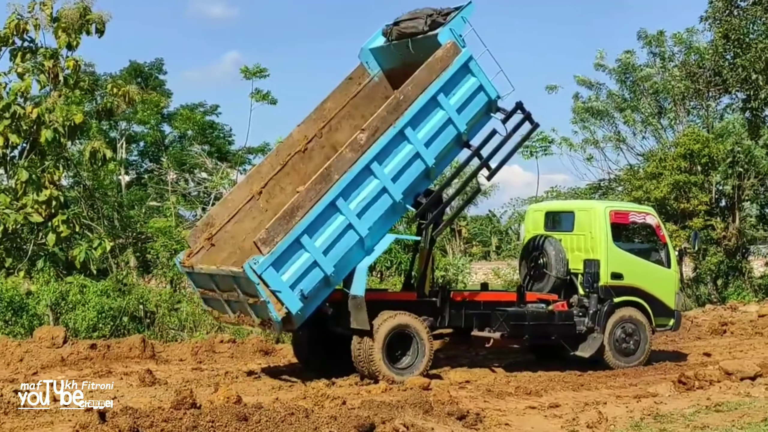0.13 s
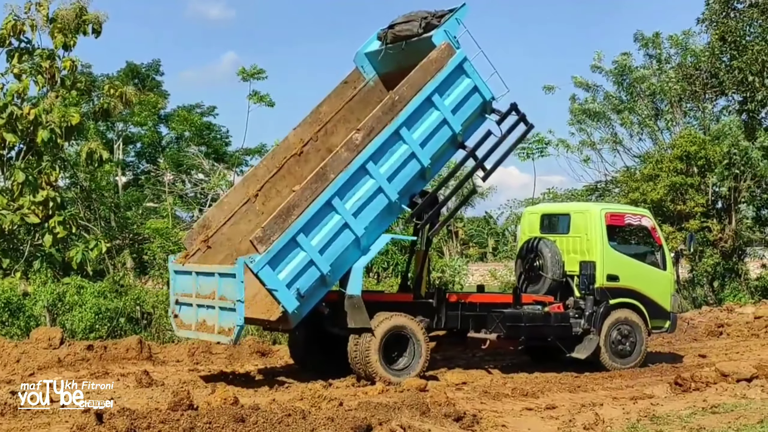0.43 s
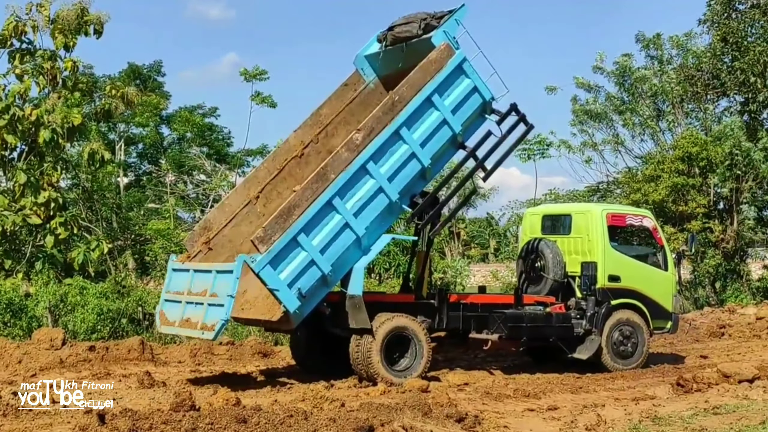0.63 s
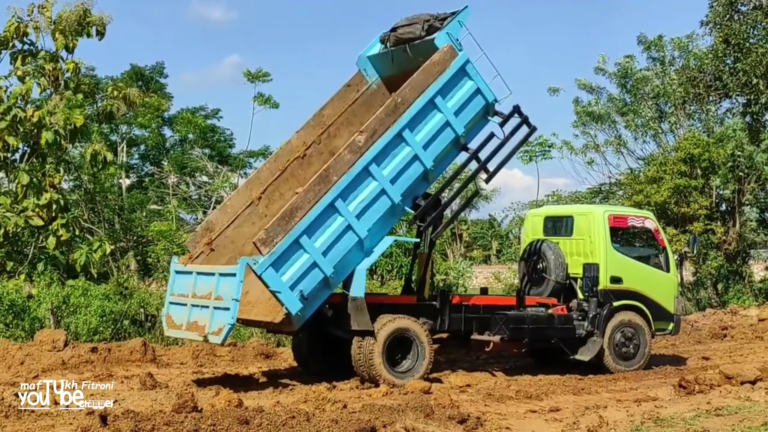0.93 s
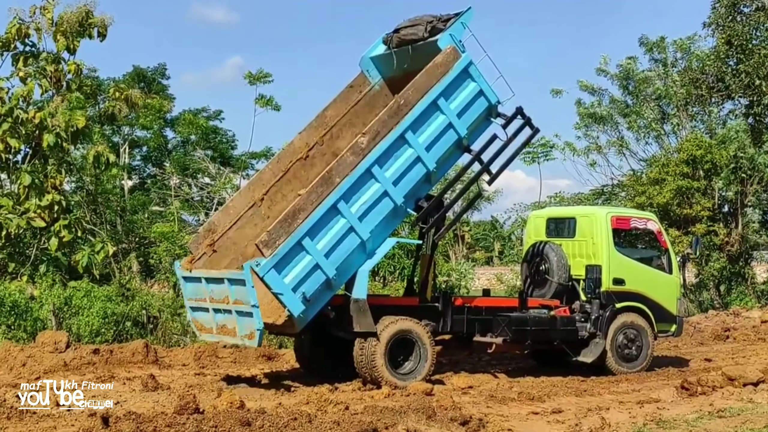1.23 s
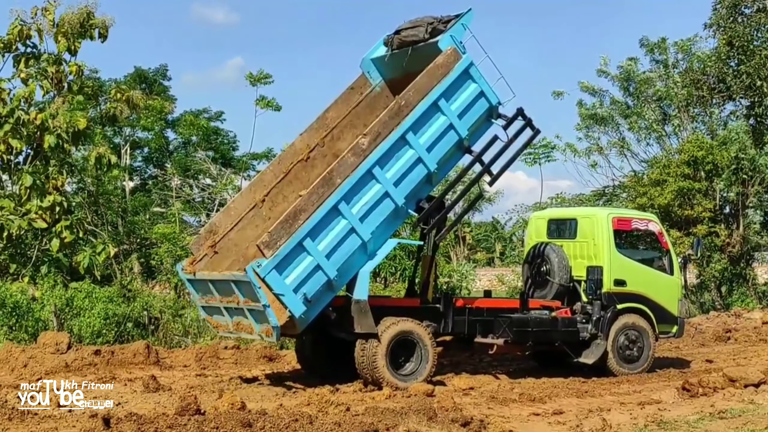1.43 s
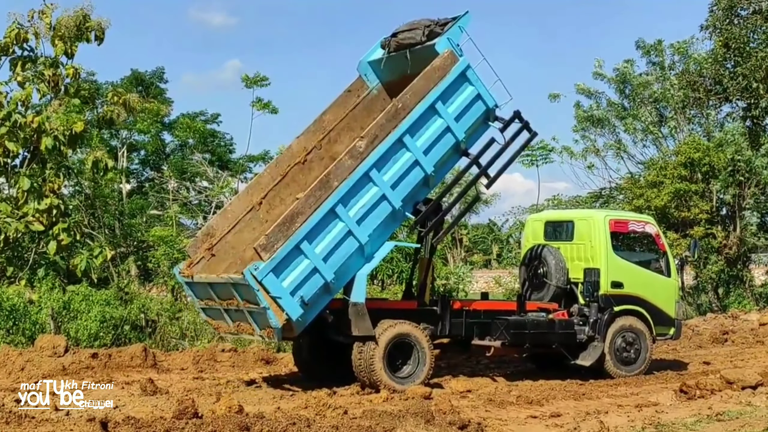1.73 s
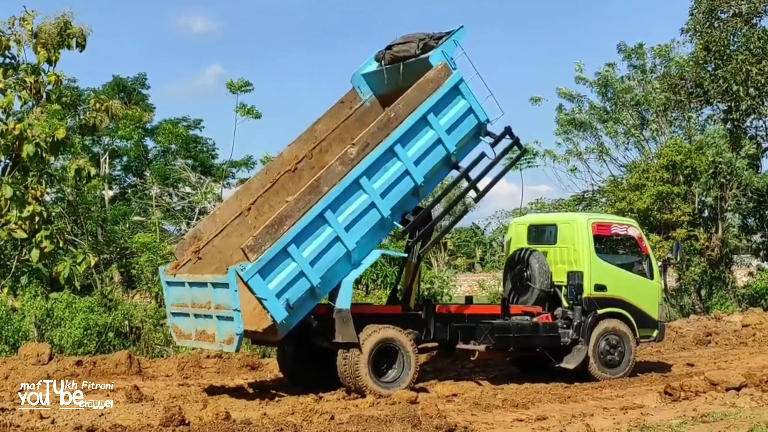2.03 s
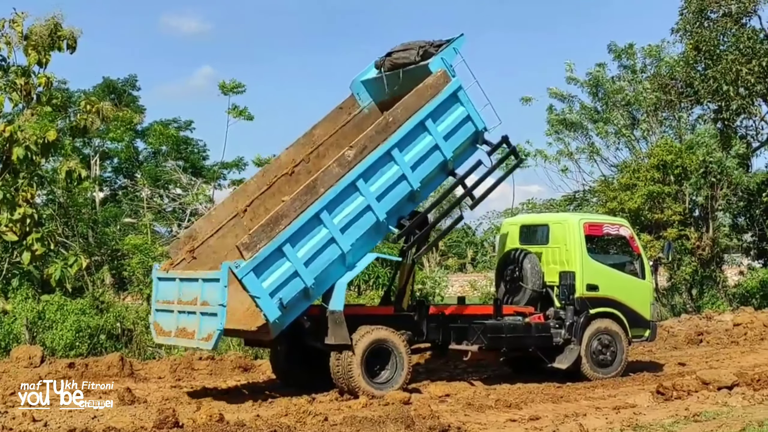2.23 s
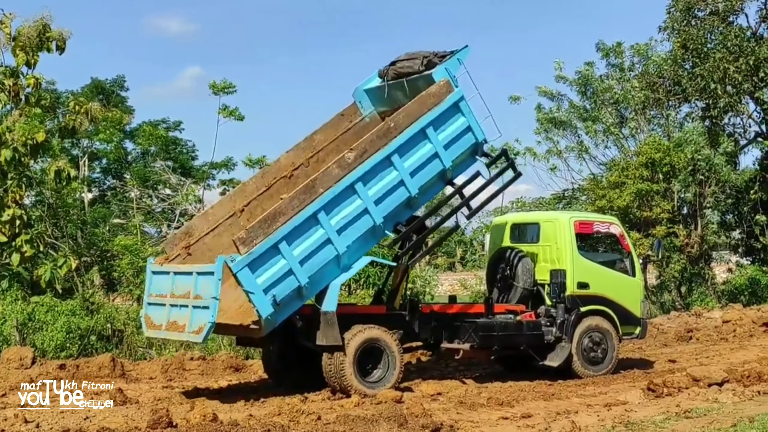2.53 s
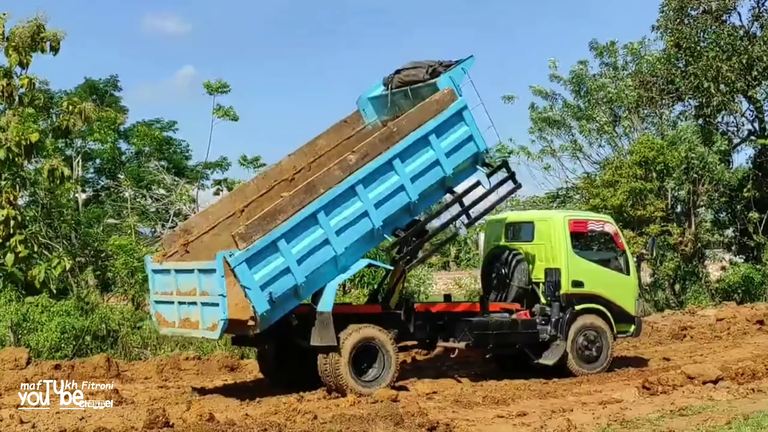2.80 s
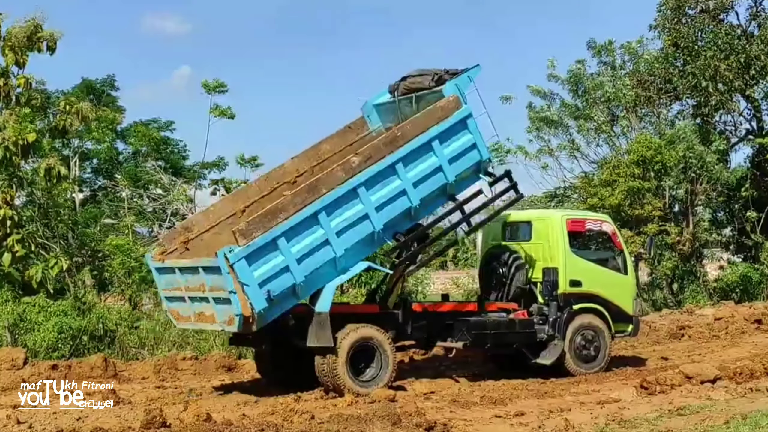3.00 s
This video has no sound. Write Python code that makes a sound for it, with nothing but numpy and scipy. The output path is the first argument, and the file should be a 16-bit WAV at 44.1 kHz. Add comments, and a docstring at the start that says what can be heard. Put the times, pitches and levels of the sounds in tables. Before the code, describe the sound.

A diesel dump truck clatters at idle on open ground over a low boom and whirring machinery. Its steel tailgate bangs shut early with small clinks, the lowering body creaks softly twice, and a hiss swells near the end.

```python
"""A four-cylinder diesel dump truck clatters at idle on open ground while its raised body comes down.
Each firing knocks the block, ticks the injectors, rattles the chassis and puffs the exhaust,
over a low boom and whirring machinery. Early on the swinging steel tailgate bangs shut once:
a few quick blows ring its panels, and its fittings clink. The body creaks softly twice,
and a hiss swells near the end."""
import sys
import numpy as np
from scipy import signal
from scipy.fft import rfft, irfft
from scipy.io import wavfile
from scipy.ndimage import uniform_filter1d, minimum_filter1d

SR = 44100
rng = np.random.default_rng(int(sys.argv[2]) if len(sys.argv) > 2 else 0)


def store_wav(level_fs):
    """Save 16-bit WAV to argv[1]."""
    pcm = np.round(np.clip(np.atleast_2d(level_fs), -1, 1) * 32767)
    wavfile.write(sys.argv[1], SR, pcm.T.astype(np.int16))


N = 139356
T, HZ = np.arange(N) / SR, np.arange(N // 2 + 1) * SR / N

# Noise spectra. Each row: frequency in Hz, relative density in dB.
WHIRR_SPECTRUM = [(5, -37), (20, 7.5), (40, -13.5), (68, 2), (95, -12), (150, 0), (200, -2), (250, -5),
                  (335, -11), (430, -14.5), (540, -8.5), (680, -15.5), (1000, -13.5), (1350, -10),
                  (1600, -15), (2300, -15), (3000, -20), (3900, -25.5), (5600, -27), (7000, -22),
                  (8200, -23.5), (10500, -44), (13000, -60)]
HISS_SPECTRUM = [(2500, -53), (4500, 15), (8000, 8), (10500, -0.5), (13000, -7.5)]
INJECTOR_SPECTRUM = [(2200, -3), (2900, -20.5), (3800, -8), (4900, 0.5), (5900, -2.5), (6900, 8), (8100, 2),
                     (9300, -11.5), (10600, -23), (13000, -23)]
RATTLE_SPECTRUM = [(40, -52), (150, -25), (300, -1), (345, -7.5), (425, 9.5), (480, -5), (560, 1.5),
                   (680, -20.5), (1000, 2.5), (1800, -6.5), (3000, -19.5), (5000, -34), (9000, -56)]
# Layer envelopes. Each row: time in seconds, level in dB.
WHIRR_LEVEL_DB = [(0, -34), (.6, -34), (1.4, -34), (2.2, -33.5), (2.6, -34), (2.85, -32.5), (3.16, -32.5)]
HISS_LEVEL_DB = [(0, -51.5), (1.6, -56.5), (2.4, -56), (2.85, -47.5), (3.05, -43), (3.16, -49.5)]
BOOM_LEVEL_DB = [(0, -28.5), (.2, -25.5), (.42, -24), (1.0, -24), (1.15, -31), (1.37, -28.5), (1.7, -29),
                 (1.88, -33), (2.05, -33), (2.25, -32.5), (2.48, -39), (2.76, -29), (2.9, -29.5),
                 (3.16, -31.5)]
RUMBLE_LEVEL_DB = [(0, -42), (.9, -41), (1.4, -37.5), (2.0, -37.5), (3.16, -35.5)]
GROWL_LEVEL_DB = [(0, -44.5), (1.0, -44.5), (2.0, -42), (2.5, -40), (3.16, -41.5)]
# Machinery drones. Each row: centre in Hz, nominal width in Hz, level in dB.
DRONE_BANDS = [(133.5, 10.7, -44), (296.5, 6.5, -43), (375, 5.2, -52), (2358, 15.5, -60)]
# Boom pitch. Each row: time in seconds, frequency in Hz.
BOOM_PITCH_HZ = [(0, 49), (.2, 51.5), (.42, 52.5), (.8, 54.5), (1.04, 55.5), (1.33, 53.5), (1.75, 54),
                 (2.0, 51.5), (2.3, 51.5), (2.5, 56), (2.8, 51), (3.16, 47)]
# Body creaks. Each row: peak time in seconds, half-length in seconds, centre in Hz, level in dB.
BODY_CREAKS = [(0.583, 0.028, 800, -39), (2.798, 0.028, 865, -39)]
# Fitting clinks. Each row: start in seconds, pitch in Hz, ring t60 in seconds, level in dB,
# left minus right in dB.
FITTING_CLINKS = [(.243, 8600, .03, -33, 8), (.251, 8245, .055, -25, 10), (.377, 8200, .025, -29, 5)]
# Tailgate blows. Each row: start in seconds, then bright, middle and deep band gains in dB.
GATE_BLOWS = [(0.2222, 2.5, -.5, -10), (0.247, -2, -1, 0), (.269, -8, -8, -3), (.291, -9.5, -10, -11.5),
              (0.304, -24, -5.5, -5.5)]
# Tailgate modes and dense sheet-metal ringing. Each row: frequency in Hz, t60 in seconds, gain in dB.
GATE_MODES = [(79.6, 1, -7.5), (117.8, 0.45, 4.5), (141.3, 0.98, 2.5), (206.5, 0.39, 1), (252.8, 0.31, 2),
              (284, 0.64, -5), (367.5, 0.54, -0.5), (466, 0.19, -1.5), (538, 0.27, 1.5), (586, .36, -2.5),
              (761, 1, -15), (817, 0.17, 3.5), (880, 0.21, -6), (920, 0.19, -1), (985, 0.2, -6),
              (1150, 0.18, -28), (1257, 0.084, -0.5), (1410, 0.11, -19), (1520, 0.17, -17)]
SHEET_BANDS = [(141, 0.48, -28), (259, 0.71, -26), (527, 0.35, -22.5), (867, 0.23, -23.5),
               (1396, 0.22, -26.5), (2800, 0.17, -36.5), (4100, 0.34, -37)]
# Engine speed. Each row: time in seconds, firing rate in Hz.
FIRING_RATE_HZ = [(0.0, 26.27), (0.2, 24.26), (0.5, 23.39), (0.9, 22.92), (1.4, 22.45), (1.9, 21.71),
                  (2.4, 20.98), (2.8, 21.38), (3.16, 21.76)]
# Cylinders in firing order. Each row: relative dB of low knock, of high knock, of tick/rattle/growl.
CYLINDER_GAINS_DB = [(-3.5, .5, 15), (3, 1, 16), (2, -6.5, 16.5), (3.5, -0.5, 16.5)]
# Block and chassis resonances. Each row: frequency in Hz, width in Hz, relative gain in dB.
BLOCK_LOW_MODES = [(1240, 36, -3), (1292, 55, 0), (1356, 26, 2.5), (1448, 40, -4)]
BLOCK_HIGH_MODES = [(1728, 22, 6), (1805, 60, 1), (1944, 14, -3.5), (2081, 15, -4.5), (2177, 18, -6),
                    (2358, 11, -2), (2517, 30, -9), (2605, 35, -7.5), (2670, 40, -7.5), (2980, 220, -16)]
CHASSIS_MODES = [(295.3, 49, -9), (431, 30, 6.5), (536, 30, -2.5)]
# Exhaust harmonics. Each row: multiple of the firing rate, level in dB.
EXHAUST_HARMONICS = [(1, -45), (2, -57), (3, -46.5), (4, -49), (5, -48.5), (6, -49), (7, -44), (8, -50.5),
                     (9, -63)]
# Stereo balance. Each row: frequency in Hz, left minus right in dB.
BALANCE_DB = [(60, 4.5), (200, 5), (500, 3), (900, 5), (1350, 4.5), (1900, 7.5), (2300, 3), (2800, 2),
              (3700, -4), (4800, -1), (5800, -3), (6800, -14), (7500, -4), (8300, 5), (9300, 10),
              (10500, 1.5), (13000, 2.5)]
# Stereo likeness. Each row: frequency in Hz, left-right correlation from -1 to 1.
CORRELATION = [(100, 0.94), (300, 1), (700, 0.89), (1400, 0.57), (2200, 0.71), (3000, 0), (4000, -0.45),
               (6000, -0.15), (12000, 0.03)]

GATE_DB, GATE_ATTACK_S, DEEP_BELOW_HZ, BRIGHT_ABOVE_HZ = -25.5, .002, 330, 690
HEAVE_AT_S, HEAVE_HALF_S, HEAVE_HZ, HEAVE_DB = .327, .022, 49, -17
FIRST_FIRING_S, FIRING_JITTER_S = .0062, .0003
LOW_KNOCK_DB, HIGH_KNOCK_DB, TICK_DB = -38, -38.5, -45.5
RATTLE_DB, RATTLE_RISE_DB_PER_S = -48, 5.5
CEILING, LIMITER_S, LOWPASS_HZ = .44, .0018, 13200


def undb(db):
    """Decibels to gain."""
    return 10 ** (np.asarray(db) / 20)


def by_time(rows):
    """Interpolate (s, value) rows linearly."""
    return np.interp(T, *np.array(rows).T)


def by_hz(rows):
    """Interpolate (Hz, value) rows over log frequency."""
    hz, value = np.array(rows).T
    return np.interp(np.log(HZ + 1), np.log(hz + 1), value)


def level(x, db):
    """Set the rms level."""
    return x * undb(db) / np.sqrt(np.mean(x ** 2))


def through(x, response):
    """Filter by a frequency response."""
    return irfft(rfft(x) * response, N)


def noise(response, db=0):
    """Two independent filtered noises at a set rms level."""
    return level(through(rng.standard_normal((2, N)), response), db)


def resonance(hz, width_hz):
    """Response of one resonance, unity at its centre."""
    return 1j * HZ * width_hz / (hz ** 2 - HZ ** 2 + 1j * HZ * width_hz)


def highpass(hz):
    """Steep high-pass response."""
    return HZ ** 12 / (HZ ** 12 + hz ** 12)


def metal(modes):
    """Response of summed resonances; heavy metal dulls the treble."""
    dull = 1 / (1 + 1j * HZ / 5000)
    return dull * sum(undb(db) * resonance(hz, width_hz) for hz, width_hz, db in modes)


def minimum_phase(spectrum):
    """Causal response with the given (Hz, dB) shape."""
    cepstrum = irfft(np.log(undb(by_hz(spectrum))), N)
    cepstrum[1:N // 2] *= 2
    cepstrum[N // 2 + 1:] = 0
    return np.exp(rfft(cepstrum))


def strike(start_s, attack_s, t60_s):
    """Envelope: linear rise, exponential fall."""
    age_s = np.maximum(T - start_s, 0)
    return np.minimum(age_s / attack_s, 1) * np.exp(-np.log(1000) * age_s / t60_s)


def spread(pair):
    """Mix two independent signals to stereo: alike in the bass, unlike in the treble."""
    correlation = by_hz(CORRELATION)
    mid = through(pair[0], np.sqrt((1 + correlation) / 2))
    side = through(pair[1], np.sqrt((1 - correlation) / 2))
    return np.array([mid + side, mid - side])


def machinery():
    """Fan and gear whirr, narrow drones, and a late-swelling hiss, probably oil leaving the ram."""
    whirr = noise(undb(by_hz(WHIRR_SPECTRUM))) * undb(by_time(WHIRR_LEVEL_DB))
    hiss = noise(undb(by_hz(HISS_SPECTRUM))) * undb(by_time(HISS_LEVEL_DB))
    drones = sum(noise(resonance(hz, 1.28 * width_hz) ** 2, db) for hz, width_hz, db in DRONE_BANDS)
    return spread(whirr + hiss + drones)


def boom():
    """A low tone wanders in pitch over a growing, uneven rumble."""
    phase = 2 * np.pi * np.cumsum(by_time(BOOM_PITCH_HZ)) / SR
    tone = np.sqrt(2) * undb(by_time(BOOM_LEVEL_DB)) * np.sin(phase)
    rumble = noise(resonance(60.2, 30.3) ** 2) * undb(by_time(RUMBLE_LEVEL_DB))
    return tone + spread(rumble)


def creaks():
    """Short, soft scrapes from the moving body."""
    return spread(sum(noise(resonance(hz, 300) ** 2, db) * np.exp(-((T - peak_s) / half_s) ** 2)
                      for peak_s, half_s, hz, db in BODY_CREAKS))


def clinks():
    """Small steel fittings tick and ring briefly."""
    out = np.zeros((2, N))
    for start_s, hz, t60_s, db, pan_db in FITTING_CLINKS:
        tick = noise(resonance(hz, 2000) ** 4, db=-9.5) * strike(start_s, attack_s=.00087, t60_s=.15)
        ring = strike(start_s, attack_s=.0038, t60_s=t60_s) * np.sin(2 * np.pi * hz * T)
        out += (tick + ring) * undb(db + np.array([[pan_db], [-pan_db]]) / 2)
    return out


def gate_envelope(hz, t60_s):
    """Each blow adds its energy to what still rings at this frequency."""
    band = 3 if hz < DEEP_BELOW_HZ else 2 if hz < BRIGHT_ABOVE_HZ else 1
    energy = sum((undb(blow[band]) * strike(blow[0], GATE_ATTACK_S, t60_s)) ** 2 for blow in GATE_BLOWS)
    return np.sqrt(energy)


def tailgate():
    """The gate lands in quick blows: bright clatter, then deep panels, then one heave of the body."""
    ring = np.zeros(N)
    for hz, t60_s, db in GATE_MODES:
        mode = rng.choice([-1, 1]) * np.sin(2 * np.pi * hz * (T - GATE_BLOWS[0][0]))
        ring += undb(GATE_DB + db) * gate_envelope(hz, t60_s) * mode
    clatter = sum(gate_envelope(hz, t60_s) * noise(resonance(hz, .8 * hz) ** 4, db)
                  for hz, t60_s, db in SHEET_BANDS)
    lag_s = T - HEAVE_AT_S
    heave = undb(HEAVE_DB) * np.exp(-(lag_s / HEAVE_HALF_S) ** 2) * np.sin(2 * np.pi * HEAVE_HZ * lag_s)
    return ring + heave + spread(clatter)


def impacts(starts_s, response, gain_column, attack_s, decay_s, scatter_db, slap_db, slap_s, repeat):
    """Each firing rings a part with one slap and a cluster of tiny impacts."""
    size = SR // 4
    age_s = np.arange(size) / SR
    envelope = np.minimum(age_s / attack_s, 1) * np.exp(-age_s / decay_s)
    ring = rfft(irfft(response, N)[:size])
    out = np.zeros((2, N + size))
    patterns = rng.standard_normal((4, 2, size))  # one per cylinder; repeat is its share of the energy
    for k, start_s in enumerate(starts_s):
        cluster = np.sqrt(repeat) * patterns[k % 4] + np.sqrt(1 - repeat) * rng.standard_normal((2, size))
        force = envelope * cluster / np.linalg.norm(envelope)
        force[0, int(slap_s * SR)] += undb(slap_db)
        db = CYLINDER_GAINS_DB[k % 4][gain_column] + scatter_db * rng.standard_normal()
        pair = irfft(rfft(force) * ring, size)
        i = max(int(start_s * SR), 0)
        out[:, i:i + size] += [level(burst, db) for burst in pair]
    return out[:, :N]


def knock(firings_s):
    """Combustion rings the block in a low and a high group of modes."""
    low_response = metal(BLOCK_LOW_MODES) * highpass(1130) * resonance(1310, 280)
    high_response = metal(BLOCK_HIGH_MODES) * highpass(1650) * resonance(2050, 1500)
    low = impacts(firings_s + .003, low_response, gain_column=0, attack_s=.002, decay_s=.009,
                  scatter_db=.4, slap_db=-1, slap_s=.001, repeat=.3)
    high = impacts(firings_s + .001, high_response, gain_column=1, attack_s=.003, decay_s=.0075,
                   scatter_db=.4, slap_db=-10, slap_s=.004, repeat=.3)
    return level(low, LOW_KNOCK_DB) + level(high, HIGH_KNOCK_DB)


def injectors(firings_s):
    """One bright injector tick per firing."""
    ticks = impacts(firings_s, minimum_phase(INJECTOR_SPECTRUM), gain_column=2, attack_s=.005,
                    decay_s=.014, scatter_db=.9, slap_db=-40, slap_s=.005, repeat=.2)
    return level(ticks, TICK_DB)


def chassis(firings_s):
    """Firings shake the chassis: a growing rattle and a panel growl."""
    rattle = impacts(firings_s, minimum_phase(RATTLE_SPECTRUM), gain_column=2, attack_s=.005,
                     decay_s=.01, scatter_db=1, slap_db=-30, slap_s=.005, repeat=.2)
    rattle *= undb(RATTLE_RISE_DB_PER_S * T)
    growl = impacts(firings_s, metal(CHASSIS_MODES) * resonance(410, 450), gain_column=2, attack_s=.002,
                    decay_s=.008, scatter_db=1.3, slap_db=-4, slap_s=.002, repeat=0)
    return level(rattle, RATTLE_DB) + level(growl, 0) * undb(by_time(GROWL_LEVEL_DB))


def exhaust(firing_count):
    """Exhaust puffs as harmonics of the firing rate."""
    return sum(np.sqrt(2) * undb(db) * np.sin(2 * np.pi * (multiple * firing_count + rng.random()))
               for multiple, db in EXHAUST_HARMONICS)


def engine():
    """Idling diesel: knock, injectors, chassis and exhaust, all locked to the firings."""
    firing_count = np.cumsum(by_time(FIRING_RATE_HZ)) / SR
    firings_s = np.interp(np.arange(int(firing_count[-1]) + 1), firing_count, T) + FIRST_FIRING_S
    firings_s += FIRING_JITTER_S * rng.standard_normal(len(firings_s))
    clatter = knock(firings_s) + injectors(firings_s) + chassis(firings_s)
    return spread(clatter) + exhaust(firing_count)


def scene():
    """The whole truck, mostly to the left."""
    truck = engine() + boom() + machinery() + tailgate() + creaks()
    balance_db = by_hz(BALANCE_DB)
    return through(truck, undb(np.array([balance_db, -balance_db]) / 2)) + clinks()


def record(dry):
    """Peak limiter, then a steep low-pass."""
    size = int(LIMITER_S * SR)
    gain = CEILING / np.maximum(np.abs(dry).max(axis=0), CEILING)
    limited = dry * uniform_filter1d(minimum_filter1d(gain, size), size)
    return signal.sosfilt(signal.ellip(8, .2, 70, LOWPASS_HZ, fs=SR, output="sos"), limited)


dry = scene()
out = record(dry)
store_wav(out)
```